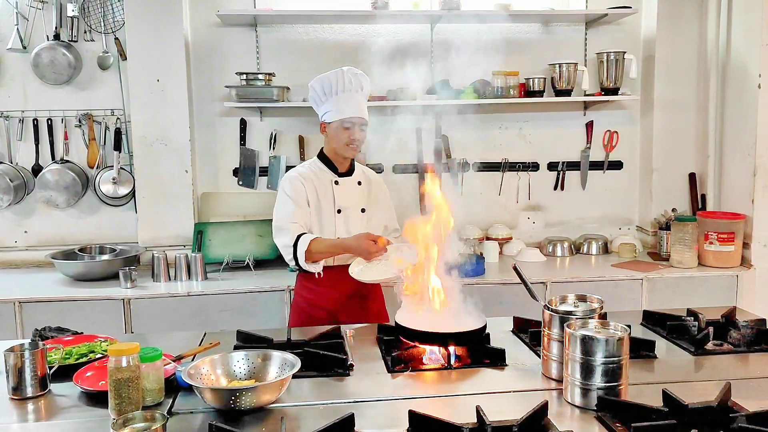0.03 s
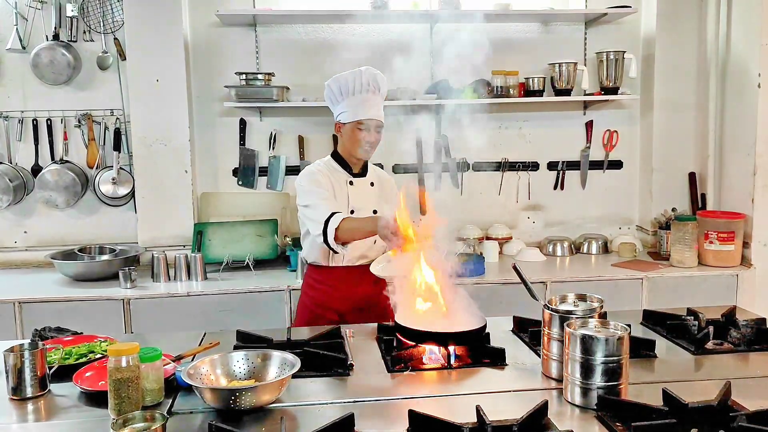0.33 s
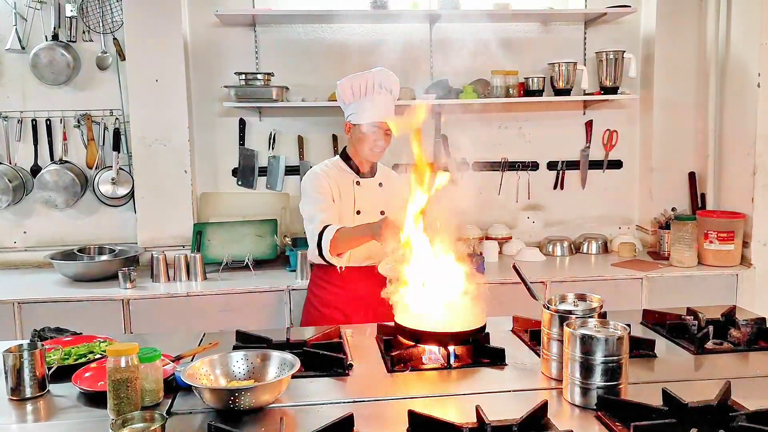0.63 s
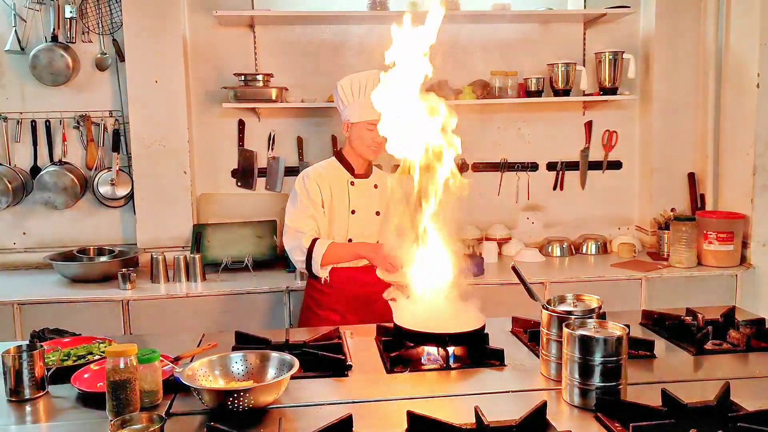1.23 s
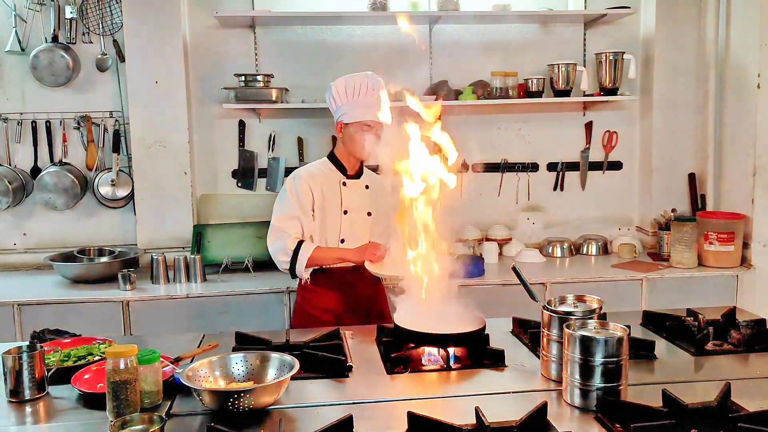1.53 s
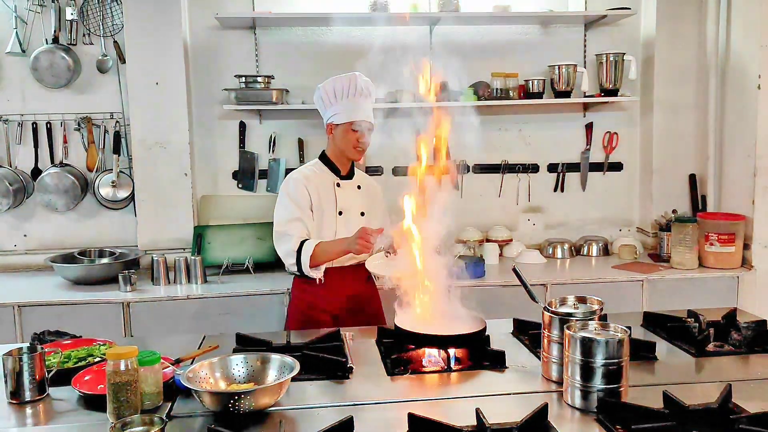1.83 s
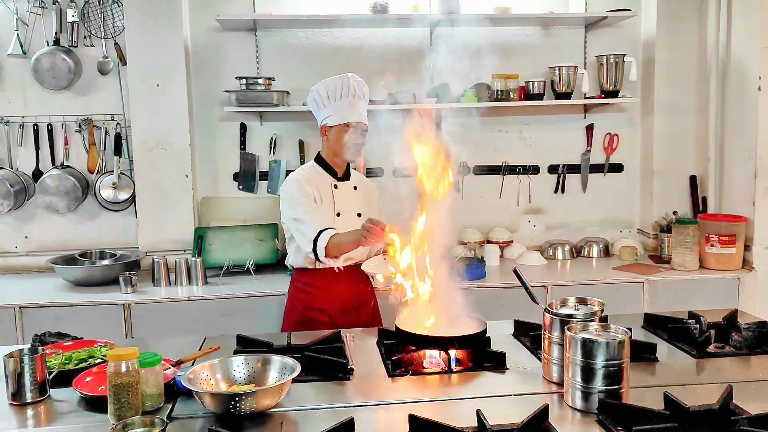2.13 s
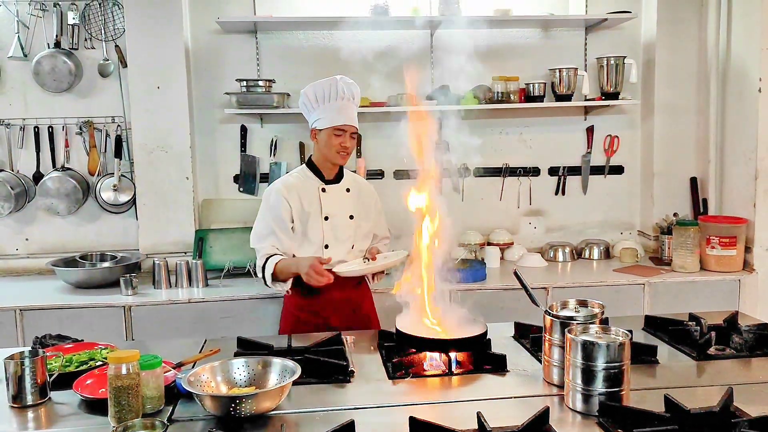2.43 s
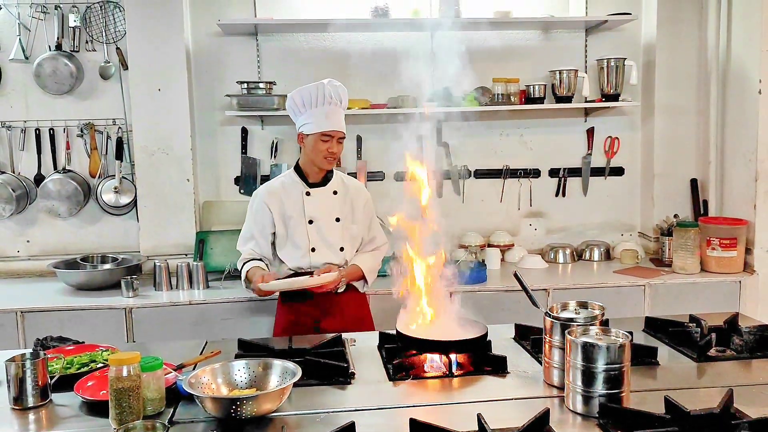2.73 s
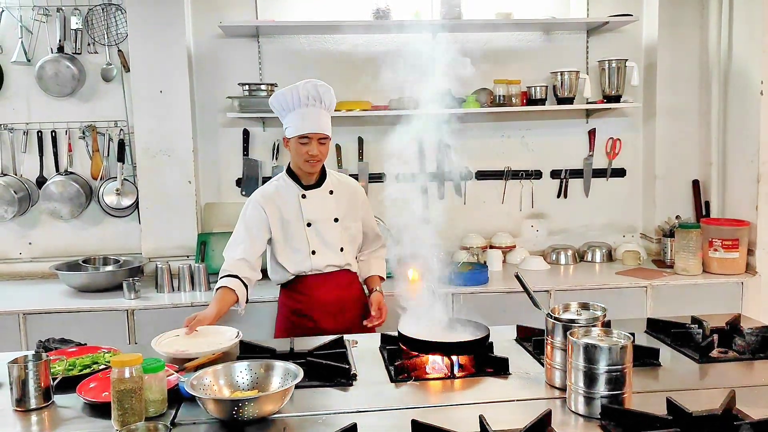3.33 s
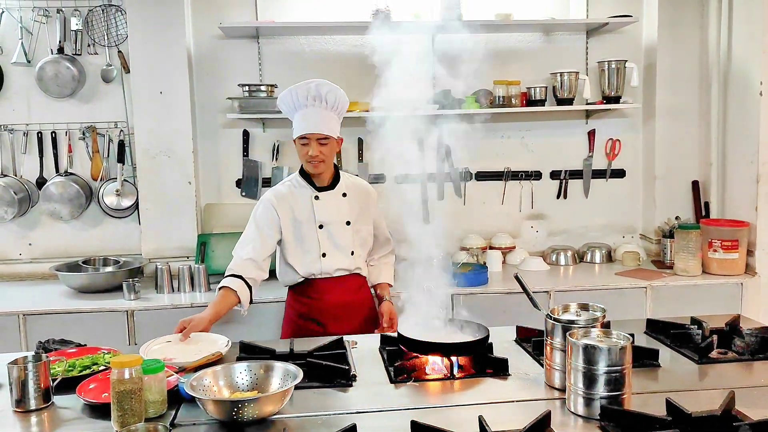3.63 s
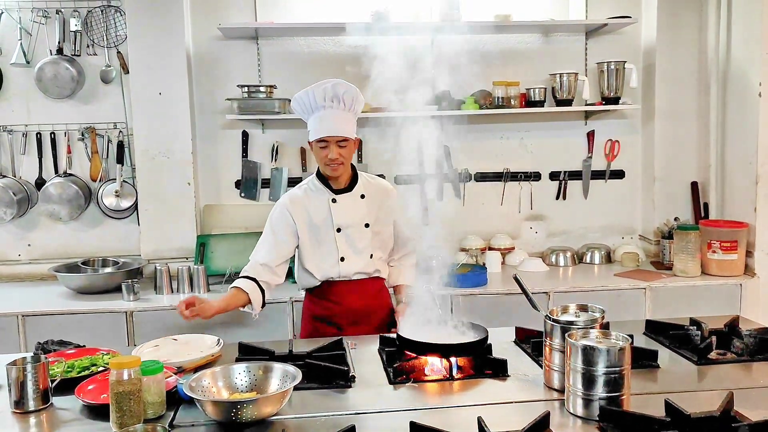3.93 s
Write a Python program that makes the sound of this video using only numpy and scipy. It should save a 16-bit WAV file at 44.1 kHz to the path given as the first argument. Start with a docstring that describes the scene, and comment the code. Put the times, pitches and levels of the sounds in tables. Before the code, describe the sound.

Sizzling surges in a hot pan before a plate is set down with a clatter.

```python
"""Sizzling pan and clattering plate

Liquid boils on a very hot pan in a tiled kitchen: bursting bubbles surge into a sizzle, flames flare
with a low flutter, and the fat spits as it settles. Near the end a china plate strikes the steel
counter, exciting the modes of both, and is nudged along it with a scrape. Two microphones a hand's
width apart hear it from across the counter."""
import sys
import numpy as np
from scipy import signal
from scipy.fft import rfft, irfft
from scipy.io import wavfile
from scipy.ndimage import uniform_filter1d

SR = 44100
rng = np.random.default_rng(int(sys.argv[2]) if len(sys.argv) > 2 else 0)


def put_to_file(sound):
    """Save the sound as 16-bit audio at rate SR, in the file named by the first command-line argument."""
    columns = np.atleast_2d(sound).T  # one column per channel
    safe = np.clip(columns, -1, 1)
    whole_steps = np.round(safe * 32767)
    wavfile.write(sys.argv[1], SR, whole_steps.astype(np.int16))


N = 176400
TIME = np.arange(N) / SR
FREQUENCY = np.arange(N // 2 + 1) * SR / N
MIC_GAP_M, SOUND_M_PER_S = .14, 343
MIC_LAG_S = MIC_GAP_M / SOUND_M_PER_S

# course of the boiling: t/s, fizz level/dB, bubbling level relative to it/dB
BOILING = [(0, -33.5, -26), (.48, -32, -14.5), (.6, -20.5, -11.5), (.69, -18, -10.5), (.95, -21.5, -12.5),
           (1.35, -26.5, -11), (1.6, -27.5, -14.5), (1.95, -28.5, -14.5), (2.25, -28, -14.5),
           (2.5, -27, -13), (2.9, -30, -17), (3.44, -30, -24), (4, -29.5, -10.5)]
# spurts of fat: t/s, spitting level/dB, extra fizz level/dB, decay time/s
FAT_SPURTS = [(1.19, -29, -26.5, 0.023), (1.665, -28.5, -25, 0.015), (2.109, -27.5, -29, 0.019),
              (2.305, -28.5, -34, 0.087), (2.44, -44, -41, 0.031), (2.665, -29.5, -32, 0.036),
              (2.792, -37, -27.5, 0.034), (2.95, -33, -30, 0.097), (3.18, -31, -35, 0.022),
              (3.26, -33.5, -48, .025)]
# impacts of the plate, with relative levels: t/s, plate ring/dB, counter boom/dB, crack/dB
IMPACTS = [(3.470, -6, 0.5, -0.5), (3.479, -10, 0, 3), (3.487, 0.5, -13, -6), (3.498, 1, 3.5, -4.5),
           (3.522, -18, -6, 1.5), (3.563, -5, -24, -12), (3.59, -22, -7, -23), (3.722, -6.5, -9, -8)]


def undb(db):
    """Amplitude ratio of a level in decibels."""
    return 10 ** (np.asarray(db) / 20)


def unit(x):
    """Normalisation to rms 1."""
    return x / np.sqrt(np.mean(x ** 2))


def curve(rows, column=1):
    """Linear interpolation of one column over time."""
    rows = np.array(rows)
    return np.interp(TIME, rows[:, 0], rows[:, column])


def spectrum(points):
    """Interpolation of (f/Hz, level/dB) points over logarithmic frequency."""
    hz, db = np.array(points).T
    return np.interp(np.log(FREQUENCY + 1), np.log(hz), db)


def convolve(x, response):
    """Convolution: the output of a linear system with this impulse response."""
    return signal.fftconvolve(np.atleast_2d(x), np.atleast_2d(response), axes=1)[:, :N]


def colour(x, points):
    """Minimum-phase filter of the given spectral shape; white noise keeps its power."""
    cepstrum = irfft(np.log(unit(undb(spectrum(points)))), N)
    cepstrum[1:N // 2] *= 2  # folding onto positive time makes the filter causal
    cepstrum[N // 2 + 1:] = 0
    response = irfft(np.exp(rfft(cepstrum)), N)
    return convolve(x, response[:SR // 8])


def diffuse_noise():
    """White noise of a diffuse field: at spaced microphones it is coherent only in the bass."""
    coherence = .95 * np.sinc(2 * FREQUENCY * MIC_LAG_S)
    angle = np.arcsin(coherence) / 2
    pair = rfft(rng.standard_normal((2, N)))
    return irfft(np.cos(angle) * pair + np.sin(angle) * pair[::-1], N)


def wander(rate_hz):
    """Slow fluctuation of rms 1: noise smoothed by two moving averages."""
    width = int(SR / rate_hz)
    smoothed = uniform_filter1d(rng.standard_normal(N), width, mode="wrap")
    return unit(uniform_filter1d(smoothed, width, mode="wrap"))


def clicks(per_s, spread_db):
    """Shot noise: random impulses, a few of them large, each with its own lag between microphones."""
    occurs = rng.random(N) < per_s / SR
    size = undb(spread_db * np.minimum(rng.exponential(size=N), 5))
    left = occurs * size * rng.choice([-1, 1], N)
    lag = np.round(rng.uniform(-1, 1, N) * MIC_LAG_S * SR).astype(int)
    right = np.bincount((np.arange(N) + lag) % N, left, N)
    return unit(np.array([left, right]))


def fade(start_s, decay_s):
    """Exponential decay after a sudden onset."""
    return (TIME >= start_s) * np.exp(-np.maximum(TIME - start_s, 0) / decay_s)


def spurt_envelope(column, rise_s=.006):
    """Superposed spurts at one column's levels, each a linear rise and an exponential fall."""
    envelope = np.zeros(N)
    for spurt in FAT_SPURTS:
        age, decay_s = TIME - spurt[0], spurt[-1]
        rise = np.clip(age / rise_s + 1, 0, 1)
        envelope += undb(spurt[column]) * rise * np.exp(-np.maximum(age, 0) / decay_s)
    return envelope


def ring(modes, blows):
    """Damped modes (f/Hz, level/dB, T60/s) gain energy from every blow (t/s, level/dB)."""
    first = int(min(s for s, _ in blows) * SR)
    t = np.arange(first, N)[:SR] / SR
    out = np.zeros((2, N))
    for (hz, db, t60), side in zip(modes, rng.choice([-1, 1], len(modes))):
        energy = sum((t >= s) * undb(db + blow_db - 60 * np.maximum(t - s, 0) / t60) ** 2
                     for s, blow_db in blows)
        # higher modes reach the two microphones out of step
        phase = side * min(np.pi * hz * MIC_LAG_S / 2, np.pi / 4) * np.array([[1], [-1]])
        out[:, first:first + len(t)] += np.sqrt(energy) * np.sin(2 * np.pi * hz * (t - t[0]) + phase)
    return out


def kitchen(x, wet_db, t60_s=.3, gap_s=.0027):
    """Reverberation: the tiles add a diffuse tail to the direct sound, at unchanged total power."""
    tail = diffuse_noise() * undb(-60 * TIME / t60_s) * (TIME > gap_s)
    wet = convolve(x, unit(tail)[:, :SR] / np.sqrt(N))
    return (x + undb(wet_db) * wet) / np.hypot(1, undb(wet_db))


def fire():
    """Combustion noise: flames rumble over the pan while the gas burner blows steadily under it."""
    # course of the flames: t/s, level/dB
    flare = [(0, -51), (.15, -57), (.5, -61), (.8, -56), (1.15, -51), (1.42, -50), (1.7, -58), (2.2, -54),
             (2.9, -59), (4, -63)]
    # spectra of the flames and the burner: f/Hz, relative level/dB
    rumble_shape = [(10, -6), (22, -1), (42, 1), (62, -6), (90, -12), (200, -26), (800, -50)]
    burner_shape = [(30, -4), (80, -21.5), (115, -3), (160, -10), (220, -9), (350, -7.5), (600, -12),
                    (1200, -9.5), (4000, -28)]
    flames = colour(diffuse_noise(), rumble_shape) * undb(curve(flare))
    burner = colour(diffuse_noise(), burner_shape) * undb(-49)
    return flames + burner


def kitchenware(t60_s=.38):
    """Free vibration: each faint ping of kitchenware is a single damped mode."""
    # pings: t/s, f/Hz, level/dB
    pings = [(.325, 2600, -37), (2.305, 3570, -30)]
    return sum(ring([(hz, db, t60_s)], [(s, 0)]) for s, hz, db in pings)


def counter():
    """Impact excitation: the steel sheet booms in its modes and shudders with the things on it."""
    # modes of the sheet: f/Hz, relative level/dB, T60/s
    sheet_modes = [(160.7, -4, 1.65), (208, -9, 0.43), (247, -6.5, 1.35), (278, 5.5, 0.34),
                   (286.7, -9, 0.32), (318, -11, 0.31), (415, -7.5, 0.5), (450, -12, .35), (593, -4, 0.43),
                   (605, -6.5, .28), (679, 4, 0.12), (814, -10, 0.2)]
    # spectrum of the shudder: f/Hz, relative level/dB
    shudder_shape = [(30, -53), (85, -34), (130, -10), (165, -1), (205, -11), (275, 3), (350, -6.5),
                     (430, -6), (520, -13.5), (680, -9.5), (1000, -18.5), (3000, -32)]
    boom = ring(sheet_modes, [(s, db - 35.5) for s, _, db, _ in IMPACTS])
    energy = sum((undb(db - 32.5) * fade(s, decay_s=.11)) ** 2 for s, _, db, _ in IMPACTS)
    return boom + colour(diffuse_noise() * np.sqrt(energy), shudder_shape)


def scrape():
    """Sliding friction: the nudged plate gives a dense train of tiny clicks."""
    # course of the slide: t/s, level/dB
    slide = [(3.79, -78), (3.83, -41), (3.87, -32), (3.91, -36.5), (3.94, -42.5), (3.97, -34), (4, -37)]
    # spectrum of the scraping: f/Hz, relative level/dB
    scrape_shape = [(70, -15), (135, -7), (190, -10), (270, 0), (350, -4.5), (450, -8), (540, -6),
                    (690, -8), (1000, -14.5), (2000, -6.5), (4000, -13), (10000, -38)]
    friction = colour(clicks(per_s=1600, spread_db=2.5), scrape_shape)
    return friction * undb(curve(slide)) * (TIME > slide[0][0])


def plate(press_s=3.79, press_t60_s=.11):
    """Impacts crack and set plate and counter ringing; a hand damps both and slides the plate."""
    # modes of the china: f/Hz, relative level/dB, T60/s
    china_modes = [(1248, -11, .35), (1649, -9, .26), (1675, -7.5, .32), (2069, -9, .26), (2125, -7, .26),
                   (2167, -3, .36), (2728, -5, .22), (2817, -1, .3), (3985, -6, .18), (4030, -6, .18),
                   (4715, -7, .2), (4946, -7, .18), (5418, -5, .18), (6734, -7, .2)]
    # spectrum of a contact's crack: f/Hz, relative level/dB
    crack_shape = [(40, -42), (100, -31), (250, -7), (700, -1), (1050, -3.5), (1700, 8.5), (2800, 7),
                   (5000, 2.5), (7000, 3), (8500, -2), (14000, -19)]
    china = ring(china_modes, [(s, db - 28) for s, db, _, _ in IMPACTS])
    damping = undb(-60 * np.maximum(TIME - press_s, 0) / press_t60_s)
    ringing = (china + counter()) * damping
    bursts = sum(undb(db - 17) * fade(s, decay_s=.011) for s, _, _, db in IMPACTS)
    cracks = colour(diffuse_noise() * bursts, crack_shape)
    return kitchen(ringing, wet_db=-10.5) + kitchen(cracks + scrape(), wet_db=-2.5)


def pan_ring(pops):
    """Resonance: the pan's modes ring faintly, driven by the popping bubbles."""
    # modes of the pan: f/Hz, relative level/dB, T60/s
    pan_modes = [(635, -4, .25), (760, -5, .25), (802, -5, .25), (867, -6, .25), (1249, -4, .3),
                 (1416, -7, .25), (1825, 0, .25), (3537, 1, .15), (4021, 1, .2)]
    response = unit(ring(pan_modes, [(.00021, 0)]))[:, :SR] / np.sqrt(N)
    return undb(-6) * convolve(pops, response)


def spitting_fat():
    """Modulated shot noise: each spurt of fat is a brief shower of clicks."""
    # spectrum of the spitting: f/Hz, relative level/dB
    spit_shape = [(100, 0), (300, -16), (750, -2.5), (1200, -1), (2500, 0), (3700, 0), (7000, -8),
                  (9000, -9), (14000, -22)]
    return colour(clicks(per_s=3500, spread_db=3.5) * spurt_envelope(column=1), spit_shape)


def fizz(flicker_db=.65):
    """Tiny bursting bubbles merge into shot noise; the room adds a diffuse wash of equal power."""
    # spectrum of the fizz: f/Hz, relative level/dB
    fizz_shape = [(300, -39), (1200, -19), (1900, -7.5), (2600, -3.5), (3600, -3), (5100, -3), (6100, -2.5),
                  (6900, 1.5), (8200, -5), (10000, -9), (12300, -6.5), (14300, -12)]
    boil = undb(curve(BOILING) + flicker_db * wander(rate_hz=28))
    strength = np.hypot(boil, spurt_envelope(column=2))  # incoherent sources add in power
    hiss = clicks(per_s=12000, spread_db=1) + diffuse_noise()
    return colour(hiss, fizz_shape) * undb(-.5) * strength


def sizzle(flicker_db=1.2):
    """Boiling noise: larger bubbles pop below the fizz in pitch and ring the pan, while fat spits."""
    # spectrum of the larger bubbles: f/Hz, relative level/dB
    bubble_shape = [(60, -18.5), (130, -5.5), (240, -4.5), (390, -1.5), (530, -6), (740, 3.5), (1100, -2),
                    (1700, 3), (2600, -4.5), (5000, -23.5), (14000, -32)]
    level_db = curve(BOILING) + curve(BOILING, column=2) + flicker_db * wander(rate_hz=25)
    pops = clicks(per_s=1500, spread_db=1) * undb(level_db)
    bubbling = colour(pops, bubble_shape)
    return fizz() + pan_ring(pops) + kitchen(bubbling + spitting_fat(), wet_db=-4.5)


def scene():
    """Superposition: the sound pressures of all sources add."""
    return fire() + kitchenware() + plate() + sizzle()


def record(dry, cutoff_hz=14350):
    """Frequency response: each microphone has its own colour, and a steep low-pass cuts the top."""
    # left minus right microphone: f/Hz, level/dB
    balance = [(200, 0), (370, 2), (700, 0), (1250, 0), (2300, -3.5), (3600, -8), (5200, -5.5),
               (6700, -9.5), (7400, -4), (8400, 2.5), (9200, 6.5), (10000, -5), (11800, 1), (14000, .5)]
    gains = undb(np.array([[1], [-1]]) * spectrum(balance) / 2)
    heard = irfft(rfft(dry) * gains, N)
    low_pass = signal.ellip(12, .2, 80, cutoff_hz, fs=SR, output="sos")
    return signal.sosfilt(low_pass, heard)


dry = scene()
out = record(dry)
put_to_file(out)
```